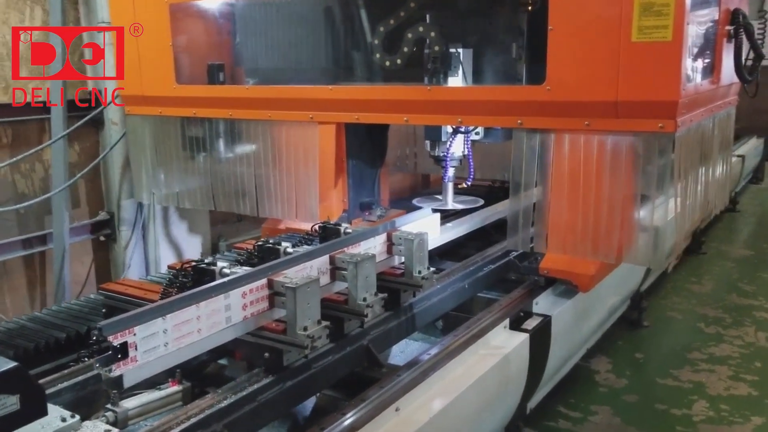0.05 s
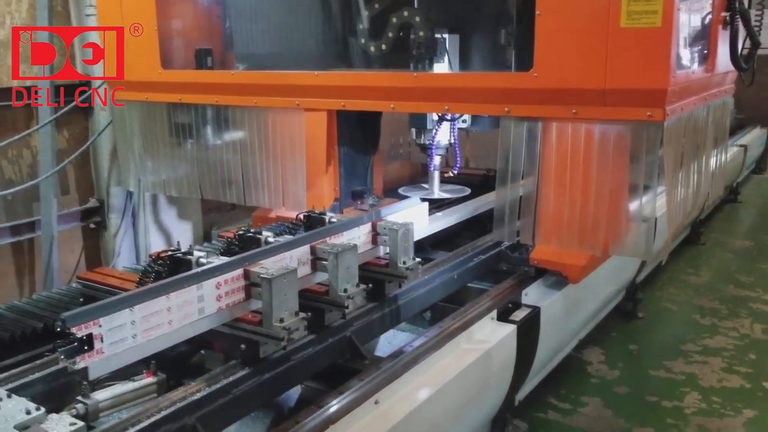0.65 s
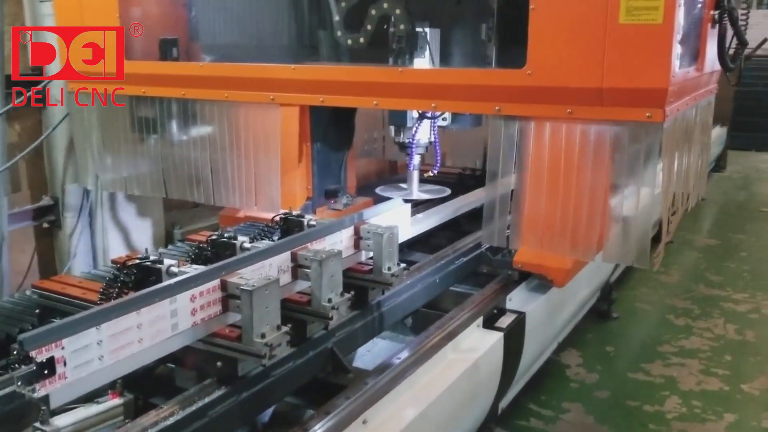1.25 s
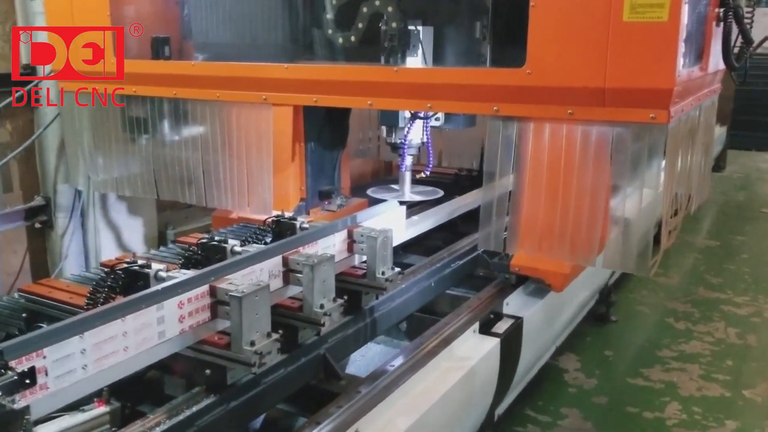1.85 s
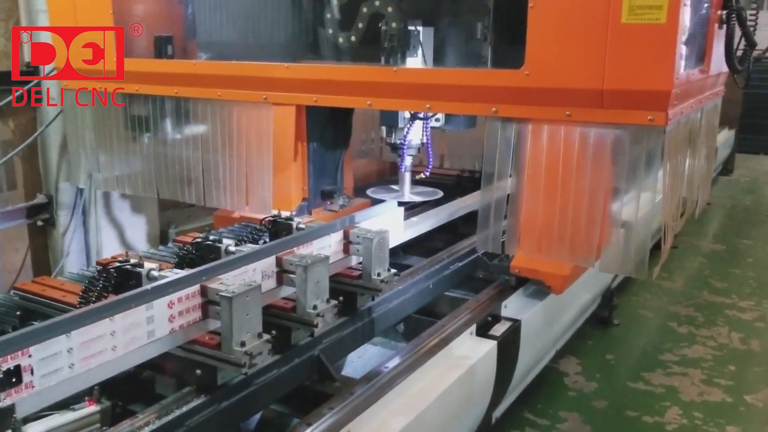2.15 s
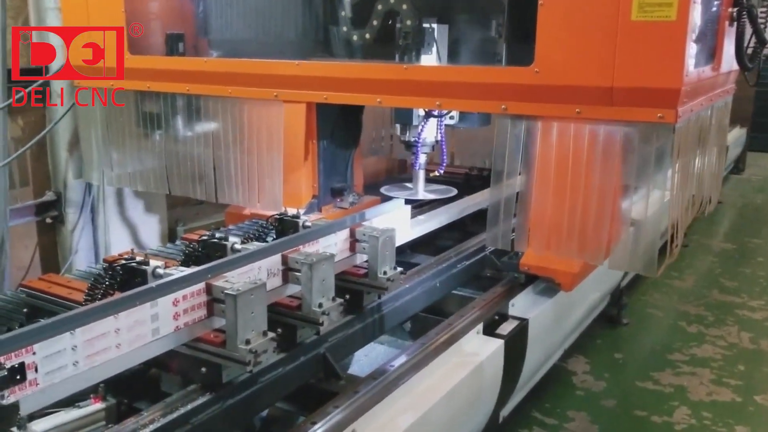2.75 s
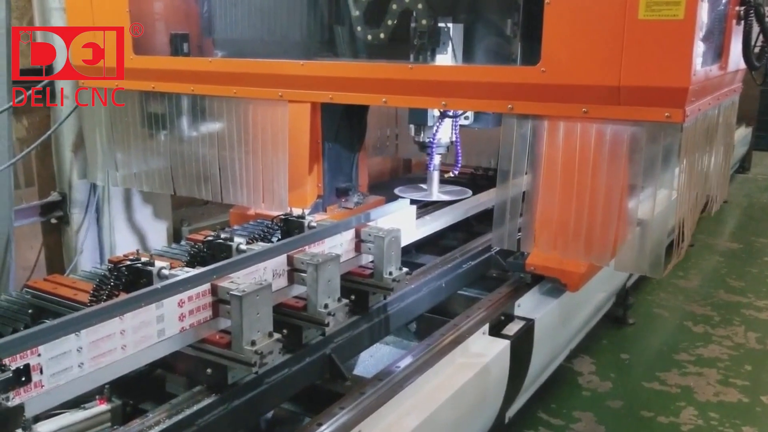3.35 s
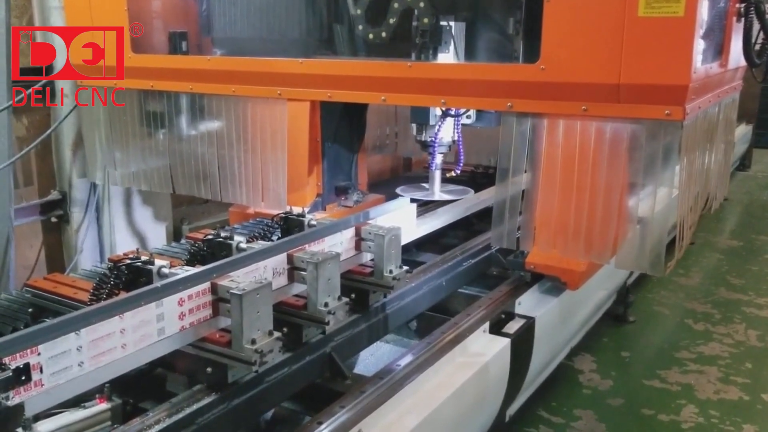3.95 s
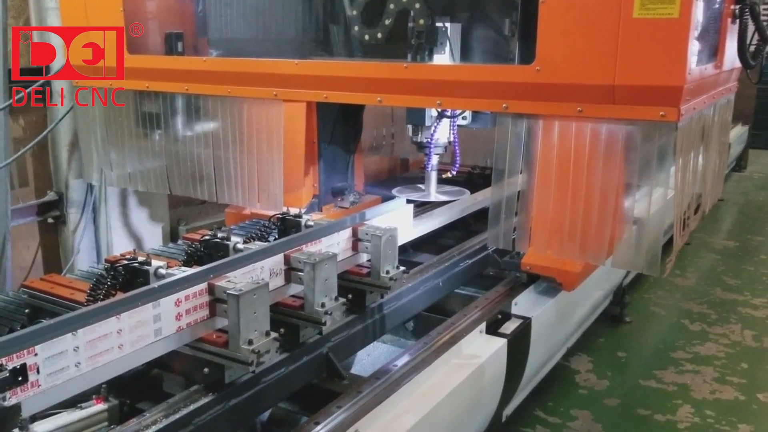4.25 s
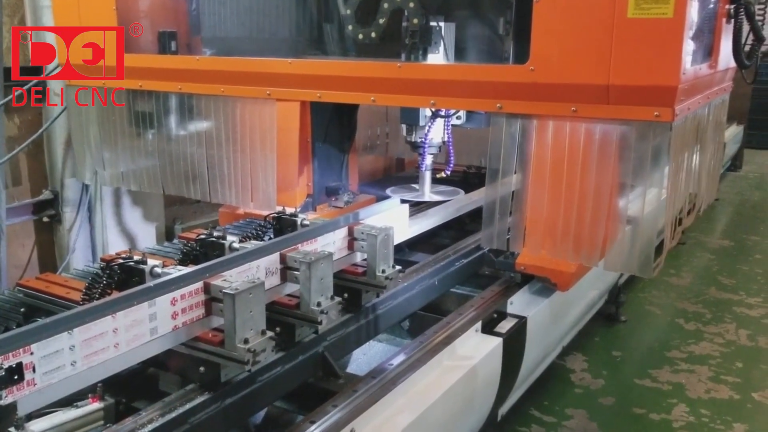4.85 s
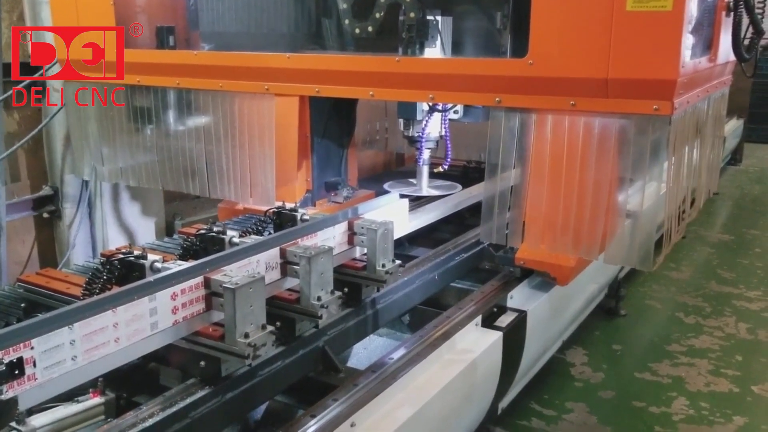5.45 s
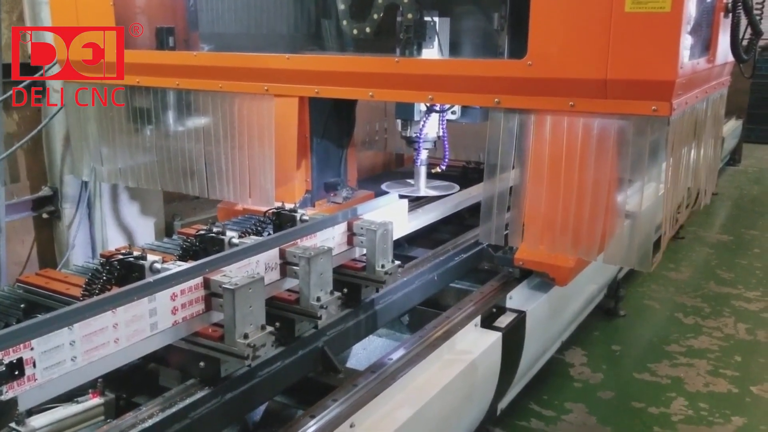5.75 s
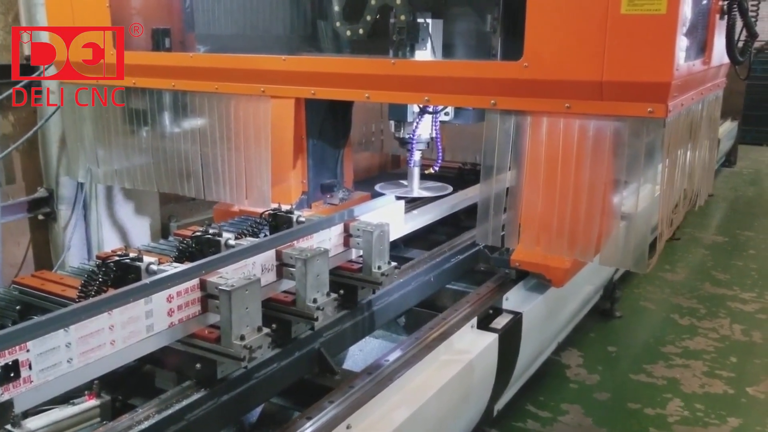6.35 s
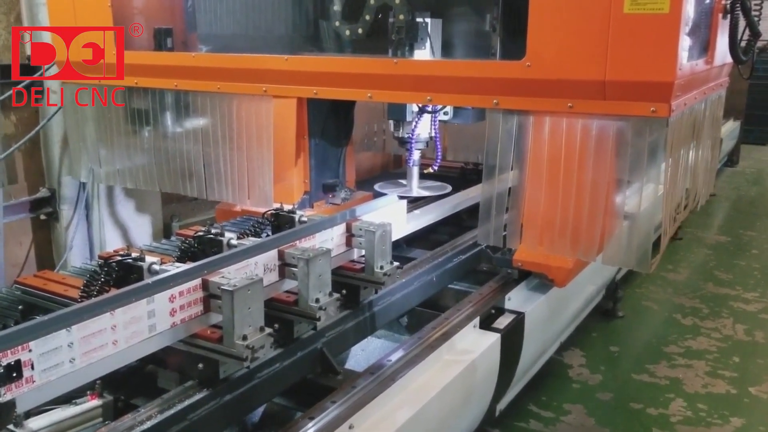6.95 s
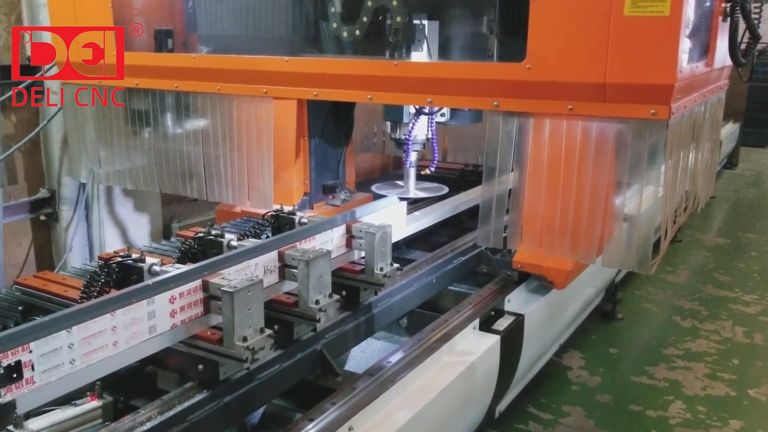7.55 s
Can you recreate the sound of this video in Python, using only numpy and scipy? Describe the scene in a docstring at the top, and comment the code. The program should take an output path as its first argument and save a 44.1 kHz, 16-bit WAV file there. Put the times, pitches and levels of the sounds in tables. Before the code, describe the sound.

An industrial saw makes two cuts in aluminium, heard from a few metres across a droning factory hall, with a constant spray hiss. The first cut scrapes and squeals, with a strong wavering howl partway through. In the pause, air roars up around the spinning blade. Sharp knocks open the second, longer cut, which rasps and rings with shifting squeals and a piercing screech near the end.

```python
"""A factory hall: a few metres away, a machining centre saws an aluminium extrusion twice.
The teeth scrape much the same pattern on every turn, forcing blade and profile to ring in their modes.
Self-excited chatter swells into squeals and a low howl; walls rasp, teeth snag and knock, the motor hums.
Turbulence makes the steady hiss of the mist nozzle and the rush of air as the blade nears the work.
A low hall drone lies underneath."""
import sys
import numpy as np
from scipy import signal
from scipy.fft import rfft, irfft
from scipy.io import wavfile
from scipy.ndimage import uniform_filter1d

SR = 44100
rng = np.random.default_rng(int(sys.argv[2]) if len(sys.argv) > 2 else 0)


def waveform_to_disk(signal):
    """Save audio, clipped to [-1, 1], as 16-bit WAV at the path in sys.argv[1]."""
    frames = np.transpose(np.atleast_2d(signal))
    scaled = np.clip(frames, -1, 1) * 32767
    samples = np.round(scaled).astype(np.int16)
    wavfile.write(sys.argv[1], SR, samples)


N = 339570
TIME, FREQS = np.arange(N) / SR, np.arange(N // 2 + 1) * SR / N

# low spectrum of the hall's drone and the draught's rumble: frequency_hz, level_db
RUMBLE_SPECTRUM = [(25, -31), (60, -18.5), (110, -12), (170, -4), (300, 2), (500, -3), (720, -5),
                   (1000, -5), (1600, -46), (3000, -50)]


def undb(db):
    """Decibels to amplitude ratio."""
    return 10 ** (np.asarray(db) / 20)


def unit(x):
    """Normalisation to an rms of one."""
    return x / np.sqrt(np.mean(x ** 2))


def curves(rows):
    """Linear interpolation in time of each column of a table."""
    times, *columns = np.transpose(rows)
    return [np.interp(TIME, times, c) for c in columns]


def steps(rows, settle_s=0.079):
    """Exponential relaxation of each column of a table towards its latest value."""
    times, *columns = np.transpose(rows)
    now = np.maximum(np.searchsorted(times, TIME, side="right") - 1, 0)
    pole = np.exp(-1 / (settle_s * SR))
    return [c[0] + signal.lfilter([1 - pole], [1, -pole], c[now] - c[0]) for c in columns]


def gate(start, end, rise, fall):
    """Envelope with a linear rise, a hold and an exponential decay; times in seconds."""
    return np.clip((TIME - start) / rise, 0, 1) * np.exp(-np.maximum(TIME - end, 0) / fall)


def walk(rate_hz):
    """Random modulation: held values, smoothed twice, with an rms of one."""
    hold = max(int(SR / rate_hz), 2)
    held = np.repeat(rng.standard_normal(N // hold + 1), hold)
    return unit(uniform_filter1d(uniform_filter1d(held, hold), hold)[:N])


def colour(points):
    """Spectral envelope through (frequency_hz, level_db) points."""
    hz, db = np.transpose(points)
    return undb(np.interp(np.log(FREQS + 1), np.log(hz), db))


def resonances(modes):
    """Frequency response of damped modes, added in power."""
    return np.sqrt(sum(undb(db) ** 2 / (1 + ((FREQS - hz) / width) ** 2) ** 2
                       for hz, width, db in modes))


def ripple(depth_db, spacing_hz):
    """Modal overlap: countless weak modes ripple a frequency response at random."""
    hz = np.arange(0, SR, spacing_hz)
    return undb(depth_db * np.interp(FREQS, hz, rng.uniform(-1, 1, len(hz))))


def shape(x, gain):
    """Filtering by a gain per frequency, to an rms of one."""
    return unit(irfft(rfft(x) * gain, N))


def diffuse(coherence):
    """A diffuse field: noise that is only partly coherent at the two ears."""
    common = np.sqrt(coherence) * rng.standard_normal(N)
    return common + np.sqrt(1 - coherence) * rng.standard_normal((2, N))


def each_turn(turns, top_order, size=4096):
    """Periodic excitation: a random pattern on the rim gives harmonics of the spindle speed."""
    orders = np.arange(size // 2 + 1)
    rim = irfft(np.exp(2j * np.pi * rng.random(len(orders))) * (orders > 0) * (orders <= top_order))
    return unit(np.interp(turns, np.arange(size) / size, rim, period=1))


def tooth_pattern(turns, change_hz=5.0, count=3):
    """Quasi-periodic excitation: the pattern scraped on each turn changes as the blade feeds in."""
    weights = np.array([walk(change_hz) for _ in range(count)])
    patterns = np.array([each_turn(turns, top_order=330) for _ in range(count)])
    return (weights * patterns).sum(0) / np.sqrt((weights ** 2).sum(0) + 0.85)


def cutting_force(turns, repeat, coherence):
    """Superposition: tearing chips gives a force partly alike on each turn, partly random."""
    # reflections in the housing bring a different pattern to each ear
    pattern = np.array([tooth_pattern(turns) for ear in range(2)])
    return np.sqrt(repeat) * pattern + np.sqrt(1 - repeat) * diffuse(coherence)


def ringing(force, modes, width_hz=26, restless_db=3.5, groups=7):
    """Modal response: narrow modes trade one supply of energy as the point of contact moves."""
    spectrum = rfft(force)
    rows = [(hz, width_hz, db) for hz, db in modes]
    out = sum(irfft(spectrum * resonances(rows[k::groups]), N) * undb(restless_db * walk(14))
              for k in range(groups))
    return out / np.sqrt(uniform_filter1d(np.mean(out ** 2, axis=0), size=4400))


def sawing(turns, reach_web_s=5.2):
    """Forced vibration: the cutting force drives the modes of blade and profile."""
    # how hard each cut is pushed: time_s, level_db, treble_db
    first_cut = [(0, -20.5, 6.5), (.1, -22.5, 2), (.24, -22, 3), (.3, -23, -2), (.62, -23.5, 0),
                 (.68, -19.5, 6), (.93, -21, 6), (1.12, -18.5, 2), (1.55, -16.5, 0.5), (1.9, -19, -2.5),
                 (2.1, -18.5, 4), (2.42, -24, 12)]
    second_cut = [(4.06, -16, 3), (4.5, -19.5, 2.1), (5.17, -20.5, 4.3), (5.28, -22.5, 2.6),
                  (5.75, -23, 3.2), (6.0, -20.5, 2.6), (6.81, -21, 3.2), (6.88, -18, 6.8),
                  (7.05, -23, 13.4), (7.2, -26, 4.9), (7.58, -22.5, 5.9), (7.7, -27, 8.4)]
    # the blade is in the metal: start_s, end_s, sink_in_s
    cut_spans = [(-1, 2.43, .01), (4.05, 8, .04)]
    # the walls it passes through: start_s, repeating_share, blade_share, bite_db, modes_db
    walls = [(0, 0.62, 0.35, 6.5, -4), (.5, 0.7, 1, 0, -1.5), (2.1, 0.3, 0.95, -4, -1.5),
             (4.0, 0.71, 0.3, 6.5, -1.5), (5.2, 0.57, 0.06, 5.5, -3), (6.1, 0.5, 0.77, 2, -3),
             (6.55, 0.64, 0.97, 1.5, 1), (7.1, .6, 1, -6, 2.5)]
    # modes of the blade, the profile's outer wall and its thin inner web: pitch_hz, level_db
    blade_modes = [(3478, -45), (3591, -44), (4242, -45), (4350, -43), (4404, -46), (4452, -40),
                   (4554, -44), (4813, -46), (5017, -42), (5120, -43), (5222, -35), (5324, -39),
                   (5529, -44), (5631, -40), (5986, -42), (6089, -43), (6142, -41), (6347, -37),
                   (6562, -42), (6600, -44), (6858, -45), (7063, -40), (7111, -37), (7165, -44),
                   (7370, -44), (7628, -42), (7930, -43), (7983, -45), (8134, -46), (8188, -44),
                   (8290, -45), (8387, -40), (8753, -46), (8904, -46), (9313, -50), (9572, -48),
                   (10266, -43), (10438, -46), (10691, -47), (11413, -49), (11666, -46), (11870, -46),
                   (12026, -42), (12333, -47)]
    wall_modes = [(3483, -42), (4237, -41), (4490, -40), (4538, -36), (4840, -42), (5044, -36), (5394, -42),
                  (5599, -38), (5749, -44), (6002, -39), (6508, -44), (6858, -44), (7187, -41), (7515, -39),
                  (7564, -39), (7612, -41), (8021, -44), (8926, -42), (9232, -47), (9835, -46),
                  (10034, -37), (10083, -39), (10998, -45), (11499, -47)]
    web_modes = [(2891, -48), (3058, -47), (3268, -47), (3515, -47), (3612, -45), (3828, -48), (4538, -44),
                 (4845, -40), (4893, -42), (4996, -47), (5098, -42), (5216, -44), (6013, -46), (6121, -45),
                 (6428, -47), (6514, -48), (6675, -47), (7704, -51), (8005, -50), (8161, -50)]
    # broad spectra of the scraping: frequency_hz, level_db
    blade_spectrum = [(100, -33), (400, -25.5), (720, -11.5), (1050, -15.5), (1450, -9.5), (1850, -12),
                      (2150, 0.5), (2400, 5.5), (2550, -3), (3200, -1.5), (5200, -3.5), (8350, -1),
                      (8650, -9.5), (9900, -5), (10250, -5), (15800, -5)]
    profile_spectrum = [(100, -49), (450, -13), (800, -5.5), (1150, -2), (1700, 0), (2300, 5), (2850, -6),
                        (3500, -7), (5200, 4.5), (7300, 1.5), (8700, -2), (11000, -0.5), (15800, -9.5)]

    repeat, blade_share, bite_db, modes_db = steps(walls)
    repeat, blade_share = np.clip([repeat, blade_share], 0, 1)
    force = cutting_force(turns, repeat, coherence=0.21)
    uneven_teeth = each_turn(turns, top_order=40)
    force = force * undb(0.77 * uneven_teeth + 0.65 * walk(700) + walk(40))
    disc, wall, web = (ringing(force, modes) for modes in (blade_modes, wall_modes, web_modes))
    blade_scrape = shape(force, colour(blade_spectrum) * ripple(depth_db=3.0, spacing_hz=40))
    profile_scrape = shape(force, colour(profile_spectrum) * ripple(depth_db=3.0, spacing_hz=40))
    in_web = steps([(0, 0), (reach_web_s, 1)])[0]
    blade = unit(blade_scrape + undb(modes_db) * disc)
    profile = unit(profile_scrape + undb(modes_db) * ((1 - in_web) * wall + in_web * web))
    ring = blade_share * blade + (1 - blade_share) * profile
    # thin chips brighten the sound in flurries, a deep bite fills in the middle
    level_db, treble_db = curves(list(first_cut) + list(second_cut))
    spectrum = rfft(ring)
    treble = irfft(spectrum / (1 + (9200 / (FREQS + 1)) ** 8), N)
    middle = irfft(spectrum / (1 + ((FREQS - 3250) / 750) ** 4), N)
    ring = ring + (undb(treble_db + walk(25)) - 1) * treble + (undb(bite_db) - 1) * middle
    contact = sum(gate(start, end, sink_in, fall=0.017) for start, end, sink_in in cut_spans)
    return ring * (contact * undb(level_db) + snags(turns))


def squeals(turns, speed_hz, octave_db=-32, waver_db=1.3, drift_rad=.45):
    """Self-excited chatter locks to the nearest spindle harmonic; uneven teeth add sidebands."""
    # spells of chatter: start_s, end_s, pitch_hz, level_db, roughness
    chatter = [(-.1, .025, 5514, -16.5, .2), (-.1, .02, 11025, -19, .3), (.036, .05, 11025, -19, .4),
               (.06, .16, 11025, -31, .8), (.11, .275, 5351, -25.5, .5), (.115, .23, 5300, -30, .6),
               (0, .13, 8230, -31, .5), (.22, .255, 10690, -26, .5), (.335, .35, 10690, -31, .5),
               (.7, .98, 8390, -30, .5), (.65, .82, 7110, -30, .4), (1.147, 1.598, 12024, -33, .4),
               (1.35, 1.64, 5219, -27, .4), (1.87, 2.05, 4452, -26.5, .4), (2.05, 2.2, 7368, -27.5, .5),
               (2.05, 2.27, 8183, -27.5, .5), (2.39, 2.43, 2555, -25.5, .65), (4.17, 4.3, 5100, -26, .8),
               (4.3, 5.17, 5043, -29.5, .7), (4.19, 4.31, 10110, -24, .4), (4.25, 5.2, 10086, -29, .9),
               (4.3, 5.18, 7565, -33, .8), (4.7, 5.16, 5600, -31, .6), (5.74, 6.01, 6428, -28, .3),
               (5.72, 6.18, 2194, -37, .7), (5.945, 6.07, 2194, -30.5, .3), (6.86, 7.075, 6342, -17.5, .2),
               (6.83, 7.05, 10280, -27, .8), (7.55, 7.75, 2199, -35, .4), (7.29, 7.75, 10280, -31, .7)]
    out = np.zeros((2, N))
    waver = np.array([walk(17) for ear in range(2)])
    slip = np.array([walk(170) + 1j * walk(170) for ear in range(2)])
    drift = np.array([walk(14) for ear in range(2)])
    ear_phase = np.array([[0], [np.pi / 2]])
    for start, end, hz, db, roughness in chatter:
        on = np.arange(max(int(start * SR), 0), min(int((end + .2) * SR), N))
        order = np.round(hz / speed_hz[on].mean())
        own = (on + rng.integers(N)) % N  # each squeal has its own stretch of the modulations
        offsets = 2 * np.pi * rng.random((3, 2, 1))
        angle = 2 * np.pi * turns[on]
        phase = order * angle + offsets[0, 0] + ear_phase + drift_rad * drift[:, own]
        phase += roughness * np.sin(angle + offsets[1])
        # slipping contact frays the tone into a narrow scrape
        grip = 1 + roughness * (0.38 * np.sin(2 * angle + offsets[2]) + .55 * slip[:, own])
        grip /= np.sqrt(np.mean(abs(grip) ** 2))
        tone = (grip * (np.exp(1j * phase) + undb(octave_db) * np.exp(2j * phase))).imag
        envelope = gate(start, end, rise=min(.3 * (end - start), .09), fall=.02)[on]
        out[:, on] += tone * envelope * undb(db + waver_db * waver[:, own])
    return out


def rasps(turns):
    """Resonance: the teeth drive one broad mode of a wall, whose pitch slides as the slot grows."""
    # spells of rough ringing: start_s, end_s, first_pitch_hz, last_pitch_hz, width_hz, level_db
    spells = [(-.1, .22, 5400, 5360, 350, -26), (.09, .25, 10770, 10700, 200, -28),
              (1.45, 1.72, 5650, 5630, 200, -32), (2.06, 2.2, 5219, 5219, 200, -27.5),
              (2.2, 2.414, 5280, 5300, 700, -32), (2.18, 2.372, 2336, 2310, 130, -35),
              (4.057, 4.211, 2590, 2520, 150, -26), (4.191, 4.37, 2496, 2437, 150, -29.5),
              (4.36, 4.52, 2270, 2236, 120, -32.5), (4.067, 4.19, 5100, 5090, 240, -22),
              (5.002, 5.1, 2260, 2220, 120, -32), (5.89, 5.95, 1420, 1420, 90, -36),
              (5.94, 6.38, 770, 770, 70, -43), (5.892, 6.118, 5400, 5620, 650, -24.5),
              (6.24, 6.325, 9500, 9500, 5000, -29), (6.895, 7.09, 6060, 6060, 200, -23),
              (6.93, 7.08, 6520, 6540, 200, -23.5), (6.823, 7.02, 11850, 11850, 2000, -26),
              (7.407, 7.62, 5250, 5230, 280, -30)]
    out = np.zeros((2, N))
    force = cutting_force(turns, repeat=0.71, coherence=0.14)
    for start, end, first_hz, last_hz, width, db in spells:
        on = np.arange(max(int(start * SR), 0), min(int((end + .15) * SR), N))
        hz = np.arange(len(on)) * SR / len(on)
        band = 1 / (1 + (2 * (hz - first_hz) / width) ** 4)
        ring = np.fft.ifft(np.fft.fft(force[:, on]) * band)
        slide_cycles = np.cumsum(np.interp(TIME[on], [start, end], [0, last_hz - first_hz])) / SR
        rasp = unit((ring * np.exp(2j * np.pi * slide_cycles)).real)
        out[:, on] += rasp * undb(db) * gate(start, end, rise=.036, fall=.024)[on]
    return out


def motor(turns):
    """Rotational harmonics: the labouring motor hums in families led by orders four, six and eight."""
    # spells of humming: start_s, end_s, order_four_db, order_six_db, order_eight_db
    hums = [(-.1, .226, -56, -47, -51), (.205, 0.676, -56, -58, -47), (4.16, 4.6, -48.5, -60, -52.5),
            (4.6, 5.2, -48.5, -64, -41.5), (5.217, 6.707, -44, -50.5, -60)]
    four, six, eight = sum(np.outer(undb(levels), gate(start, end, rise=0.035, fall=0.028))
                           for start, end, *levels in hums)
    # order, family_envelope, level_db
    partials = [(3, four, -13), (4, four, 0), (5, eight, -9), (6, six, 0), (8, eight, 0),
                (11, four, -7), (14, eight, -4), (15, four, -3), (16, eight, -2), (19, eight, -1)]
    out = 0.
    for order, family, db in partials:
        phase = 2 * np.pi * (order * turns + rng.random()) + 0.44 * walk(5.9)
        out = out + family * undb(db + 2.0 * walk(6)) * np.sin([phase, phase + 0.85])
    return out


def mist(level_db=-28.5):
    """Jet noise: turbulence at the mist nozzle hisses steadily."""
    # spectrum of the jet: frequency_hz, level_db
    jet_spectrum = [(700, -27), (1700, -16), (2050, -1.5), (2500, -0.5), (3300, 2.5), (5000, -1.5),
                    (7200, -0.5), (8300, -10), (10000, -7.5), (11100, -4), (12500, -8.5), (15800, -6)]
    return shape(diffuse(coherence=0.052), colour(jet_spectrum)) * undb(level_db + .5 * walk(12))


def hall(flicker_db=2.2, modes_db=-45.5):
    """A diffuse field with room modes: a low hall drone, whose level as heard rises and falls slightly."""
    # level of the drone as heard: time_s, level_db
    drone_levels = [(0, -51), (.85, -47), (1.1, -45), (2.5, -46), (4.2, -48.5), (5.0, -49.5), (6.8, -45),
                    (7.7, -49.5)]
    # resonances of the hall: pitch_hz, width_hz, level_db
    room_modes = [(410.5, 11.4, 0.5), (703, 108, -1.5), (1346, 39, -9.5)]
    drone = shape(diffuse(coherence=0.23), colour(RUMBLE_SPECTRUM))
    drone *= undb(curves(drone_levels)[0] + flicker_db * walk(15))
    ring = shape(diffuse(coherence=0.15), resonances(room_modes))
    return drone + ring * undb(modes_db + flicker_db * walk(9.9))


def snags(turns, decay_s=0.027, decay_turns=0.75):
    """Envelope of repeated impacts: a caught tooth strikes again on each turn, ever weaker."""
    # a tooth catches: start_s, peak_db
    catches = [(.512, -28), (.666, -24), (1.4914, -20), (2.073, -16), (6.5544, -22), (7.552, -20.5)]
    out = np.zeros(N)
    for start, db in catches:
        i = int(start * SR)
        turn_fraction = (turns[i:] - turns[i]) % 1
        out[i:] += undb(db) * np.exp(-(TIME[i:] - start) / decay_s - turn_fraction / decay_turns)
    return out


def howl(turns, main_order=42, waver_db=1.5):
    """Flutter: a low blade mode locks to the spindle, amplitude-modulated once a turn."""
    # course of the howl: time_s, level_db, throb_depth, lower_sideband_share
    course = [(.66, -42, .3, .3), (.8, -28, .3, .3), (.93, -24.5, .3, .3), (1.02, -21.2, .12, .3),
              (1.275, -20.5, .05, .3), (1.297, -25.5, .2, .5), (1.342, -25, .4, .6), (1.355, -21.5, .4, .6),
              (1.382, -21.5, .4, .6), (1.395, -26, .8, .6), (1.478, -25.5, .7, .6), (1.49, -21, .5, .7),
              (1.515, -22, .5, .7), (1.535, -25, .8, .7), (1.655, -28, .8, .4), (1.69, -23, .5, .3),
              (1.81, -20.7, .5, .2), (1.94, -22, .8, .1), (2.03, -24.5, .5, .2), (2.08, -23, .5, .3),
              (2.15, -27.5, .5, .3), (2.2, -34, .4, .3)]
    # it breaks into bursts, one on each turn: start_s, length_s, depth
    judders = [(.925, .03, .4), (1.359, .032, .9), (1.493, .028, 1), (1.556, .04, .6), (2.035, .11, .7)]
    # its weaker partials: spindle_order, level_db
    partials = [(14, -34), (15, -31), (28, -31), (39, -20), (45, -21), (46, -20), (47, -16), (70, -22),
                (87, -18), (102, -14)]
    angle = 2 * np.pi * turns
    ear_angles = np.array([angle, angle + .5])
    level_db, depth, lower_share = curves(course)
    throb = (1 - lower_share) * np.exp(1j * ear_angles) + lower_share * np.exp(-1j * ear_angles)
    throb *= 1 + .25 * walk(35)
    swell = undb(level_db) * gate(course[0][0], course[-1][0], rise=0.074, fall=0.033) * np.sqrt(2)
    for start, length, judder in judders:
        bursting = gate(start - .012, start + length, rise=.006, fall=.012)
        swell = swell * (1 + judder * bursting * np.cos(angle - angle[int(start * SR)]))
        depth = depth * (1 - bursting)
    ear_phase = np.array([0.11 * walk(14), 1.5 + 0.2 * walk(14)])
    tone = (1 + depth * throb) * np.exp(1j * (main_order * angle + ear_phase))
    for order, db in partials:
        phase = order * angle + 2 * np.pi * rng.random((2, 1))
        phase += 0.72 * np.array([walk(10.1), walk(9.14)])
        tone += undb(db + 3.5 * walk(6.93)) * np.exp(1j * phase)
    return swell * tone.imag * undb(waver_db * walk(24.7))


def draught(idle_roar_db=-40.5, idle_hiss_db=-41, crossover_hz=2200):
    """Turbulence and cavity resonance: the blade's draught hisses, rumbles and roars near the work."""
    # spectrum of the rushing air: frequency_hz, level_db
    rush_spectrum = [(59, -54), (100, -43), (233, -24), (593, -9.5), (748, -2), (905, -9.5), (1190, -5),
                     (2020, -4), (2250, -4), (4620, -6), (9300, -14.5), (12300, -12.5), (15800, -24.5)]
    # cavities between blade and work: pitch_hz, width_hz, level_db
    cavity_modes = [(1024, 16, -3.5), (1183, 30, -0.5), (1406, 80, 2), (1620, 27, -7.5), (1790, 46, 2),
                    (2050, 22, 3.5)]
    # swells near the work: start_s, end_s, rise_s, fall_s, roar_db, hiss_db, rumble_db
    swells = [(2.63, 2.75, 0.072, 0.15, -38, -36, -41), (2.985, 4.015, 0.36, 0.079, -36, -21.5, -38.5),
              (3.3, 3.52, .2, .06, -26.5, -28, -60), (3.513, 4.049, 0.17, 0.019, -20.5, -22.5, -64),
              (4.19, 5.304, 0.047, .5, -32, -29, -52), (5.197, 6.463, 0.99, 0.36, -25.5, -28.5, -50)]
    housing = ripple(depth_db=3.2, spacing_hz=45)
    response = np.hypot(colour(rush_spectrum) * housing, resonances(cavity_modes))
    rush = shape(diffuse(coherence=0.024), response)
    hiss = irfft(rfft(rush) / (1 + (crossover_hz / (FREQS + 1)) ** 6), N)
    rumble = shape(diffuse(coherence=0.3), colour(RUMBLE_SPECTRUM))
    powers = sum(np.outer(undb(levels), gate(start, end, rise, fall)) ** 2
                 for start, end, rise, fall, *levels in swells)
    roar_gain, hiss_gain, rumble_gain = np.sqrt(powers)
    low = (rush - hiss) * np.hypot(roar_gain, undb(idle_roar_db)) + rumble * rumble_gain
    high = hiss * np.hypot(hiss_gain, undb(idle_hiss_db))
    return low * undb(walk(45)) + high * undb(walk(45))


def knocks():
    """Impact excitation: the highest teeth strike the wall, whose damped modes ring briefly."""
    # the strikes: start_s, level_db
    strikes = [(4.053, -12.5), (4.0585, -18), (4.0718, -14), (4.0918, -19), (4.1112, -19), (4.1315, -20),
               (4.1512, -24), (4.634, -17.5), (4.721, -19), (5.019, -19)]
    # modes of the struck wall: pitch_hz, width_hz, level_db
    struck_modes = [(1720, 150, -7), (2500, 180, -2), (5000, 300, 3), (5900, 550, -2), (7500, 830, -5),
                    (11100, 2400, -8.5)]
    contact = sum(undb(db) * gate(start, start + .003, rise=.001, fall=0.005) for start, db in strikes)
    return contact * shape(diffuse(coherence=0.16), resonances(struck_modes))


def scene(free_speed_hz=51.17, full_load_sag_hz=.74):
    """Superposition: the machine, timed by a spindle that slows under load, sounds over air and hall."""
    # the blade meets thicker or thinner metal: start_s, load_share
    loads = [(0, .16), (.3, 0), (2.1, .1), (4.08, 1), (5.18, .2), (6.45, .03)]
    speed_hz = free_speed_hz - full_load_sag_hz * steps(loads)[0]
    turns = np.cumsum(speed_hz) / SR
    machine = (sawing(turns) + howl(turns) + squeals(turns, speed_hz)
               + rasps(turns) + knocks() + motor(turns))
    slightly_left = undb([[.2], [-.2]])
    return machine * slightly_left + mist() + draught() + hall()


def record(dry):
    """Soft saturation rounds the highest peaks; a low-pass filter cuts the top."""
    cutoff_hz = 15800
    rounded = np.tanh(0.73 * dry) / 0.67
    return signal.sosfilt(signal.ellip(10, .2, 80, cutoff_hz, fs=SR, output="sos"), rounded)


dry = scene()
out = record(dry)
waveform_to_disk(out)
```